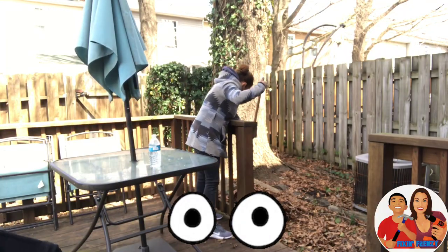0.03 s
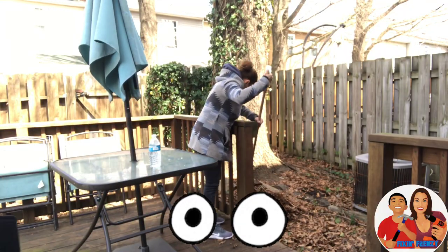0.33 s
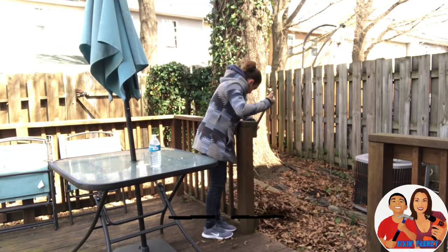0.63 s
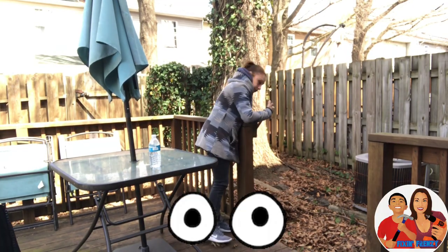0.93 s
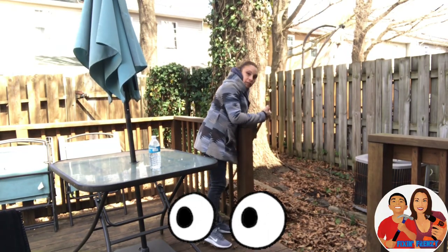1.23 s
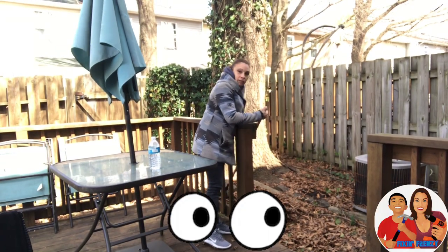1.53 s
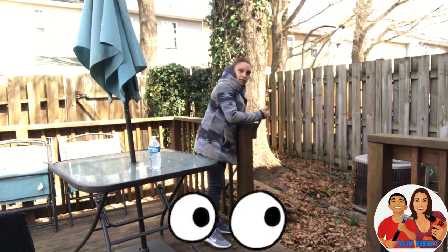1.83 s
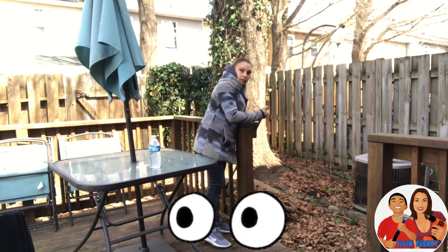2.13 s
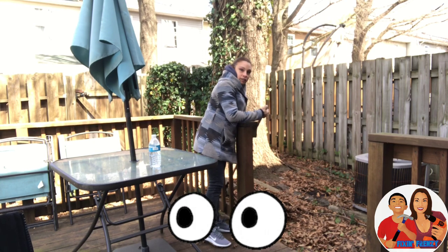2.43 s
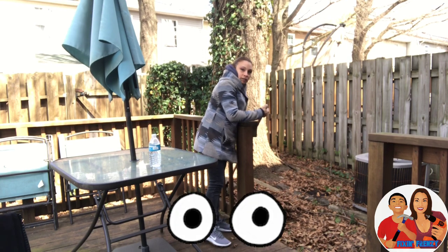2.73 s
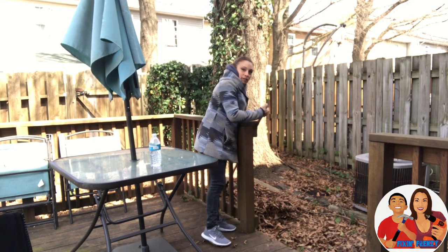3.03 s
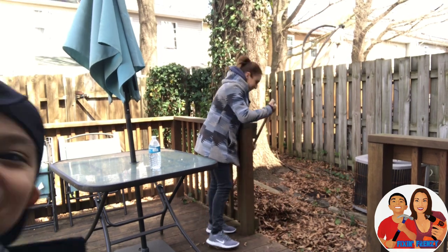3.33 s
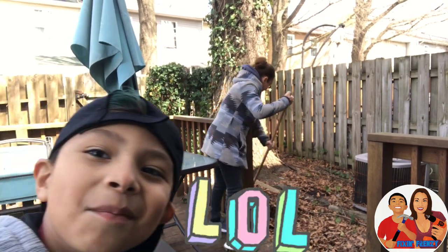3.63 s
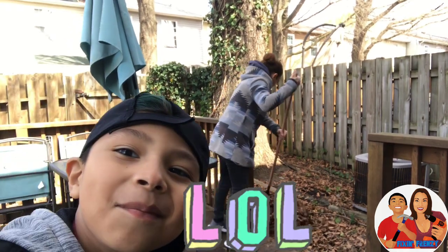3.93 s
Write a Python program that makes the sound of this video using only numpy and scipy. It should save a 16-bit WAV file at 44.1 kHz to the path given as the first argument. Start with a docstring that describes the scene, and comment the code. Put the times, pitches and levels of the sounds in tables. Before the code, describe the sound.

Raking dry leaves: two crackling strokes with a pause between, and a jacket swishing.

```python
"""Dry leaves are raked beside a wooden deck in a quiet backyard, over far traffic and a low hum.
The first stroke rustles and snaps through the leaves; a foot thumps and scuffs the boards, the handle knocks.
Jacket cloth swishes close by, and the tines scrape and ring.
The pile settles with faint ticks into a pause; at about 3 s a second stroke begins."""
import sys
import numpy as np
from scipy import signal
from scipy.fft import rfft, irfft
from scipy.io import wavfile
from scipy.ndimage import uniform_filter1d, map_coordinates

SR = 44100
rng = np.random.default_rng(int(sys.argv[2]) if len(sys.argv) > 2 else 0)


def to_wav(s):
    """Save 16-bit WAV."""
    ch = np.atleast_2d(s).T  # columns
    pcm = np.round(np.clip(ch, -1, 1) * 32767)  # PCM
    wavfile.write(sys.argv[1], SR, pcm.astype(np.int16))


N = 176400
T, HZ = np.arange(N) / SR, np.fft.rfftfreq(N, 1 / SR)


def amp(db):
    """Decibels to gain."""
    return 10 ** (np.asarray(db) / 20)


def unit(x):
    """Scale to rms 1."""
    return x / np.sqrt(np.mean(x ** 2) + 1e-20)


def level(points):
    """Gain curve from (time_s, level_db) points."""
    return amp(np.interp(T, *np.transpose(points)))


def colour(x, spectrum):
    """Filter by (freq_hz, level_db) points; rms 1."""
    freq_hz, level_db = np.transpose(spectrum)
    gain = amp(np.interp(np.log(HZ + 1), np.log(freq_hz + 1), level_db))
    return unit(irfft(rfft(x) * gain, N))


def wander(rate_hz):
    """Smooth random drift; rms 1."""
    return unit(irfft(rfft(rng.standard_normal(N)) / (1 + (HZ / rate_hz) ** 4), N))


def flutter(rate_hz, depth_db):
    """Randomly wavering gain."""
    return amp(depth_db * wander(rate_hz))


def grains(per_s, spread_db):
    """Random train of tiny fractures or slips of uneven size; rms 1."""
    size = amp(spread_db * np.minimum(rng.exponential(1, N), 4))
    return unit(size * rng.choice([-1, 1], N) * (rng.random(N) < per_s / SR))


def swells(rows, curve):
    """Gain of overlapping swells; rise and fall each span 20 dB."""
    power = np.zeros(N)
    for peak_s, rise_s, fall_s, level_db in rows:
        from_peak = np.maximum((peak_s - T) / rise_s, (T - peak_s) / fall_s)
        power += amp(level_db - 20 * from_peak ** curve) ** 2
    return np.sqrt(power)


def add(mix, start_s, sound):
    """Mix a sound in at start_s, no earlier than 0."""
    part = mix[max(round(start_s * SR), 0):][:len(sound)]
    part += sound[:len(part)]


def clicks(rows, rattle_t60_s, rattle_db, echo_t60_s, echo_db):
    """Per row: a sharp pulse, a brief rattle and a faint scatter of echoes."""
    out, size = np.zeros(N), 4096
    t, hz = T[:size], abs(np.fft.fftfreq(size, 1 / SR)) + 1
    for start_s, level_db, centre_hz, width_oct in rows:
        log_gain = -1.7 * np.log(1 + (np.log2(hz / centre_hz) / width_oct) ** 2 / 3)
        pulse = np.fft.ifft(np.exp(np.conj(signal.hilbert(log_gain)))).real  # minimum phase
        rattle = rng.standard_normal(size) * amp(-60 * t / rattle_t60_s)
        echoes = rng.standard_normal(size) * amp(-60 * t / echo_t60_s)
        body = amp(rattle_db) * rattle / np.linalg.norm(rattle)
        body += amp(echo_db) * echoes / np.linalg.norm(echoes)
        body[0] += 1  # direct pulse
        click = signal.fftconvolve(pulse, body)
        add(out, start_s, amp(level_db) * click / np.linalg.norm(click))
    return out


# Traffic spectrum: freq_hz, level_db
TRAFFIC_SPECTRUM = [(25, -30), (42, -4), (60, 1), (80, -9.5), (110, -4.5), (150, -15.5), (200, -15),
                    (400, -21), (650, -25), (1050, -24.5), (2200, -38), (3600, -40.5), (4150, -39.5),
                    (4800, -44.5), (12000, -45.5), (16000, -48)]


def traffic(level_db=-60.5):
    """Far traffic: a low, nearly steady rumble."""
    rumble = colour(rng.standard_normal(N), TRAFFIC_SPECTRUM)
    return amp(level_db) * rumble * flutter(rate_hz=8.1, depth_db=0.5)


# Hum envelope: time_s, level_db
HUM_ENVELOPE = [(0, -73), (1.7, -67), (2.55, -68), (2.8, -60.5), (4, -60.5)]


def machine_hum(pitch_hz=109.7, drift_hz=1.554):
    """A distant machine: one tone, wavering in pitch and level."""
    phase = 2 * np.pi * np.cumsum(pitch_hz + drift_hz * wander(rate_hz=4.1)) / SR
    return np.sqrt(2) * np.sin(phase) * level(HUM_ENVELOPE) * flutter(rate_hz=14, depth_db=1.6)


# Pull of the rake: time_s, level_db
PULL_ENVELOPE = [(0, -43.5), (.08, -44.5), (.22, -50), (.36, -56.5), (.48, -52), (.56, -58.5), (.67, -56),
                 (.82, -73), (.92, -54), (1.18, -54.5), (1.26, -58.5), (1.42, -65), (1.56, -76),
                 (1.85, -71.5), (1.92, -83.5), (2.95, -86.5), (3.08, -61.5), (3.19, -64), (3.34, -47.5),
                 (3.52, -50), (3.6, -48), (3.68, -46), (3.77, -44.5), (3.87, -43), (3.96, -44.5), (4, -46)]
# Crinkle spectrum: freq_hz, level_db
LEAF_SPECTRUM = [(120, -31), (200, -4.5), (320, -5), (700, -2), (1100, 1), (1900, 0), (3100, 2),
                 (4400, 3.5), (5000, -3), (5800, -2), (7000, -0.5), (9400, -3), (11000, -5), (13500, -4.5),
                 (16000, -14)]
# Crinkle treble: time_s, gain_db
TREBLE_ENVELOPE = [(0, -0.5), (.25, -1), (.6, -2), (1.2, -1), (3.2, -2.5), (3.5, -5), (3.6, -3),
                   (3.78, 2.5), (4, 1.5)]


def leaf_rustle(crossover_hz=4870):
    """Dense, clumped crinkles follow the pull of the rake."""
    crinkle = colour(grains(per_s=14000, spread_db=1.9), LEAF_SPECTRUM)
    treble = irfft(rfft(crinkle) / (1 + (crossover_hz / (HZ + 1)) ** 8), N)
    body = (crinkle - treble) * flutter(rate_hz=110, depth_db=0.4)
    crisp = treble * level(TREBLE_ENVELOPE) * flutter(rate_hz=120, depth_db=0.5)
    return (body + crisp) * level(PULL_ENVELOPE)


# Crackle of loose leaves: time_s, level_db
SETTLE_ENVELOPE = [(0, -47), (.2, -65), (.6, -69), (.82, -70), (.95, -54.5), (1.12, -52.5), (1.27, -61.5),
                   (1.42, -64), (1.52, -61.5), (1.58, -75), (1.7, -70), (1.86, -76), (1.92, -90),
                   (2.1, -86), (2.16, -76), (2.22, -86), (2.35, -84.5), (2.9, -90), (3.01, -73),
                   (3.08, -68.5), (4, -58)]


def settling_leaves(per_s=600, kinds=16, low_hz=3000, high_hz=13400, width_oct=0.83, t60_s=0.0057):
    """Single leaves tick as the pile settles, each kind with its own band and brief rattle."""
    out, size = np.zeros(N), 1024
    hz = np.fft.rfftfreq(size, 1 / SR) + 1
    for centre_hz in np.geomspace(low_hz, high_hz, kinds):
        rattle = rng.standard_normal(size) * amp(-60 * T[:size] / t60_s)
        rattle = np.roll(rattle, size // 16)  # room for the filter's pre-ring
        tick = irfft(rfft(rattle) / (1 + (np.log2(hz / centre_hz) / width_oct) ** 2))
        out += signal.oaconvolve(grains(per_s / kinds, spread_db=6), unit(tick))[:N]
    return unit(out) * level(SETTLE_ENVELOPE)


# Footfalls: start_s, level_db, rolloff_db_per_oct
FOOTFALLS = [(-.015, -39.5, 5), (.231, -25, 0), (1.099, -43.5, 10), (1.159, -60, 6), (3.27, -41, 5.5)]
# Deck modes, deepest first: pitch_hz, level_db, t60_s, delay_s
DECK_MODES = [(57.9, -4.5, 0.33, 0.0149), (106.6, -18.5, 0.36, 0.0075), (209, -5.5, 0.053, 0.0114),
              (377, -5, 0.047, 0.00384), (479, -4, 0.039, 0.00324), (620, -13, 0.036, 0.0005)]


def footsteps(rise_s=0.0043):
    """A heel lands and the deck rings, its deepest mode last."""
    out, t = np.zeros(N), T[:SR]
    attack = np.minimum(t / rise_s, 1)
    for start_s, step_db, rolloff_db_per_oct in FOOTFALLS:
        for pitch_hz, mode_db, t60_s, delay_s in DECK_MODES:
            loss_db = rolloff_db_per_oct * np.log2(pitch_hz / DECK_MODES[0][0])
            decay = amp(step_db + mode_db - loss_db - 60 * t / t60_s)
            add(out, start_s + delay_s, attack * decay * np.sin(2 * np.pi * pitch_hz * t))
    return out


# Twig and leaf breaks: start_s, level_db, centre_hz, width_oct
TWIG_SNAPS = [(.064, -27, 14100, 0.23), (.4934, -25, 12000, 0.93), (0.4991, -22.5, 2380, 0.79),
              (0.5061, -22, 4030, 0.23), (0.6248, -28, 3800, 0.42), (1.1668, -24, 3185, 0.93),
              (1.192, -20.5, 3200, 0.8), (1.2311, -17.5, 8450, 0.45), (1.256, -33, 9000, 1),
              (1.366, -34, 8000, 0.46), (1.3783, -27.5, 10000, 0.61), (1.415, -36, 8500, .45),
              (1.4472, -33, 8300, 0.45), (1.4689, -13.5, 8100, 0.59), (1.47, -21.5, 1760, 0.65),
              (1.508, -27, 6800, 0.78), (1.5755, -33, 6000, 0.67), (1.6212, -33, 13000, 0.79),
              (1.69, -35, 2790, 0.96), (1.7868, -35, 4500, 1), (1.799, -37.5, 2600, 0.6),
              (1.835, -41, 4060, 0.24), (1.847, -37, 7500, .4), (3.0714, -38, 5000, 1),
              (3.0868, -28, 3900, 0.49), (3.1244, -28, 5530, 1), (3.3838, -20, 8000, 0.42),
              (3.4875, -16, 8000, .9), (3.511, -21, 8000, .9), (3.5195, -20, 8000, .9),
              (3.5353, -22.5, 5000, 1)]


def twig_snaps():
    """Dry twigs and leaves break with sharp clicks."""
    return clicks(TWIG_SNAPS, rattle_t60_s=0.004, rattle_db=-2.5, echo_t60_s=0.045, echo_db=-6)


# Shoe scuffs: peak_s, rise_s, fall_s, level_db
SHOE_SCUFFS = [(.285, 0.086, 0.063, -49), (.458, 0.021, 0.13, -51.5), (.93, 0.056, 0.087, -58.5),
               (.98, .012, 0.087, -52), (1.02, 0.031, 0.025, -51.5), (3.3, 0.035, 0.14, -55.5),
               (3.48, 0.045, 0.23, -56.5), (3.7, 0.039, 0.095, -51)]
# Scuff spectrum: freq_hz, level_db
SCUFF_SPECTRUM = [(30, 0), (70, -4.5), (220, 1), (400, -6.5), (750, -10), (1300, -14), (3000, -20.5),
                  (16000, -47)]


def shoe_scuffs():
    """Soles rub the boards: swells of dull noise."""
    return colour(rng.standard_normal(N), SCUFF_SPECTRUM) * swells(SHOE_SCUFFS, curve=1.4)


# Handle and board knocks: start_s, level_db, centre_hz, width_oct
WOOD_KNOCKS = [(.2965, -28.5, 1450, 0.3), (.454, -24, 680, 0.31), (.9238, -12.5, 2080, 0.62),
               (.9242, -22, 700, 0.62), (.9984, -14, 1480, 0.88), (.9992, -22, 543, 0.43),
               (1.3274, -17.5, 2140, 0.54), (1.334, -26, 285, .25), (3.135, -34, 1150, 0.49),
               (3.684, -21.5, 770, 0.7), (3.698, -26.5, 795, 0.6)]


def wood_knocks():
    """The handle and the boards knock dully."""
    return clicks(WOOD_KNOCKS, rattle_t60_s=0.019, rattle_db=-2, echo_t60_s=0.16, echo_db=-6)


def ring(x, modes):
    """Filter by (pitch_hz, width_hz, level_db) resonances; rms 1."""
    power = sum(amp(db) ** 2 / (1 + ((HZ - hz) / width_hz) ** 2) ** 2 for hz, width_hz, db in modes)
    return unit(irfft(rfft(x) * np.sqrt(power), N))


# Tine rubs: peak_s, rise_s, fall_s, level_db
TINE_RUBS = [(.68, 0.42, 0.13, -60.5), (3.478, 0.026, .025, -49.5)]


def tine_rubs(pitch_hz=1940, width_hz=180):
    """Quick slips drive one resonance: a thin rubbing note."""
    slips = grains(per_s=3000, spread_db=2.1)
    return ring(slips, [(pitch_hz, width_hz, 0)]) * swells(TINE_RUBS, curve=1.2)


def folds(x, depth_db):
    """Shifting resonances of cloth folds: random patches of gain in time and frequency; rms 1."""
    spectra = signal.stft(x, nperseg=512, noverlap=384)[2]
    patches = uniform_filter1d(rng.standard_normal(spectra.shape), size=3, axis=0)
    patches = uniform_filter1d(patches, size=24, axis=1)
    spectra *= amp(depth_db * unit(patches))
    return unit(signal.istft(spectra, nperseg=512, noverlap=384)[1][:N])


# Cloth swishes: peak_s, rise_s, fall_s, level_db
JACKET_SWISHES = [(.703, 0.056, 0.13, -46), (.95, 0.11, 0.034, -47.5), (1.033, 0.08, 0.07, -40),
                  (1.14, 0.079, 0.12, -53.5), (3.28, 0.093, 0.13, -48), (3.38, 0.083, 0.04, -44),
                  (3.462, 0.094, 0.076, -33), (3.518, .015, .04, -50)]
# Cloth spectrum: freq_hz, level_db
CLOTH_SPECTRUM = [(180, -14), (300, -11), (537, -12.5), (1530, -2.5), (1660, -5), (2000, 0.5), (2440, 0.5),
                  (4160, 1), (7950, 2), (10600, -0.5), (13500, -4), (16000, -6)]


def jacket():
    """Fine, bright friction of cloth on cloth, coloured by its moving folds."""
    friction = colour(grains(per_s=16000, spread_db=2.5), CLOTH_SPECTRUM)
    swish = folds(friction, depth_db=2.5) * flutter(rate_hz=108, depth_db=1.36)
    return swish * swells(JACKET_SWISHES, curve=1)


# Tine scrapes: peak_s, rise_s, fall_s, level_db, pitch_ratio, width_ratio
TINE_SCRAPES = [(1.028, 0.044, 0.057, -46.5, 1.054, 1.6), (1.18, 0.16, 0.067, -50.5, 1.006, 1),
                (3.24, 0.044, 0.059, -43.5, 1, 0.74), (3.297, 0.058, 0.055, -40.5, 1.005, 0.91)]
# Tine modes: pitch_hz, width_hz, level_db
TINE_MODES = [(1136, 78, -3.5), (1250, 37, 4), (1355, 50, -6), (1530, 86, -4.5), (2270, 134, -5.5),
              (3070, 47, 1.5), (3510, 80, -3.5), (3820, 100, -3.5), (4650, 88, -7.5), (6300, 96, -6),
              (7050, 570, -10), (8670, 210, -6.5), (9800, 280, -9.5), (11780, 230, -8.5), (13300, 200, -11),
              (14650, 330, -13)]


def tine_scrapes(rasp_db=-6.5, flex_depth=0.012, flex_hz=21.9):
    """Slips rasp and ring the tines, bent differently in each scrape; flexing wavers their pitch."""
    out = np.zeros(N)
    rasp = amp(rasp_db) * colour(grains(per_s=9000, spread_db=2.1), LEAF_SPECTRUM)
    flexed_index = T * SR + flex_depth * np.cumsum(wander(flex_hz))
    for peak_s, rise_s, fall_s, level_db, pitch_ratio, width_ratio in TINE_SCRAPES:
        bent_modes = [(hz * pitch_ratio, width_hz * width_ratio, db) for hz, width_hz, db in TINE_MODES]
        ringing = ring(grains(per_s=9000, spread_db=1.2), bent_modes)
        wavering = map_coordinates(ringing, [flexed_index], order=3, mode="wrap")
        out += (wavering + rasp) * swells([(peak_s, rise_s, fall_s, level_db)], curve=2.2)
    return out


def yard(x, t60_s=0.28, wet_db=-15, echoes_per_s=2000, gap_s=0.004):
    """Add thin echoes from the fence and house wall."""
    t = T[:SR // 2]
    echoes = rng.standard_normal(len(t)) * (rng.random(len(t)) < echoes_per_s / SR)
    tail = echoes * (t > gap_s) * amp(-60 * t / t60_s)
    return x + amp(wet_db) * signal.fftconvolve(x, tail / np.linalg.norm(tail))[:N]


def scene():
    """Far background plus near sources echoing in the yard; both channels alike."""
    far = traffic() + machine_hum()
    near = leaf_rustle() + settling_leaves() + footsteps() + twig_snaps() + shoe_scuffs()
    near += wood_knocks() + tine_rubs() + jacket() + tine_scrapes()
    mono = far + yard(near)
    return np.array([mono, mono])


def record(dry, notch_hz=10420, notch_width_hz=340, notch_db=-6.5, low_cut_hz=40, high_cut_hz=15900):
    """Treble dip of the microphone port, bass roll-off, band limit."""
    notch = amp(notch_db * np.exp(-((HZ - notch_hz) / notch_width_hz) ** 2))
    highpass = signal.butter(2, low_cut_hz, "high", fs=SR, output="sos")
    lowpass = signal.firwin(401, high_cut_hz, window=("kaiser", 8), fs=SR)
    heard = signal.sosfilt(highpass, irfft(rfft(dry) * notch, N))
    return signal.oaconvolve(heard, lowpass[None], "same")


dry = scene()
out = record(dry)
to_wav(out)
```